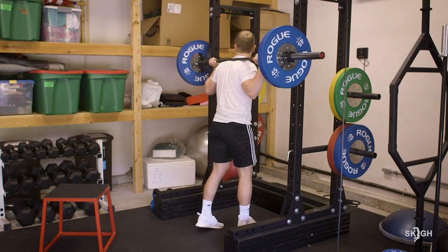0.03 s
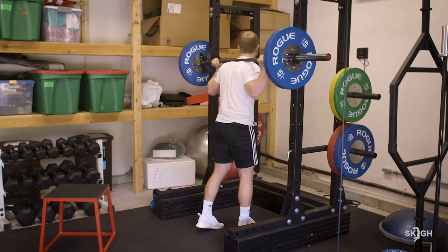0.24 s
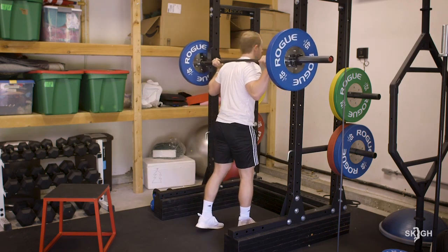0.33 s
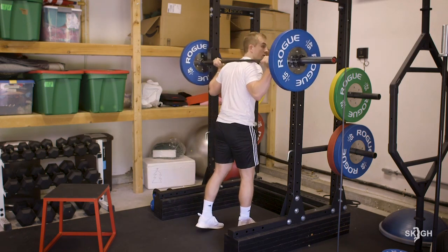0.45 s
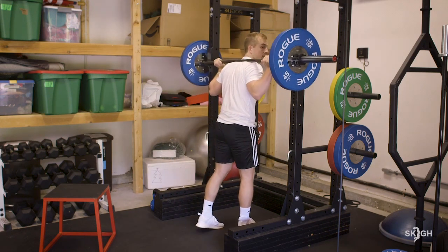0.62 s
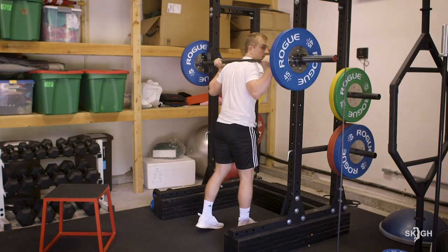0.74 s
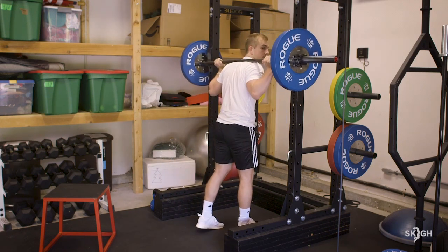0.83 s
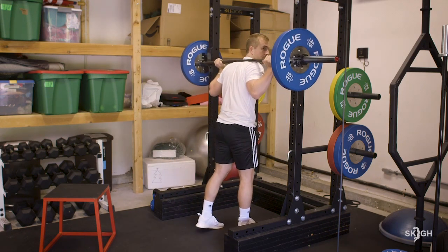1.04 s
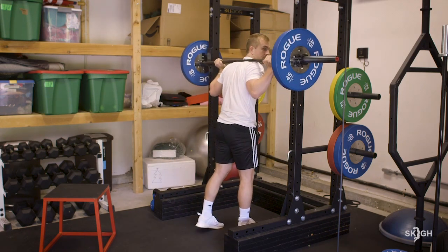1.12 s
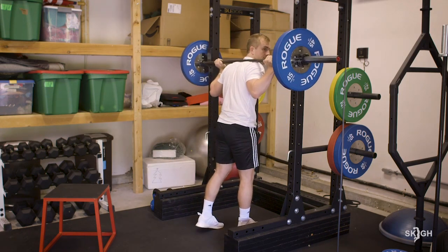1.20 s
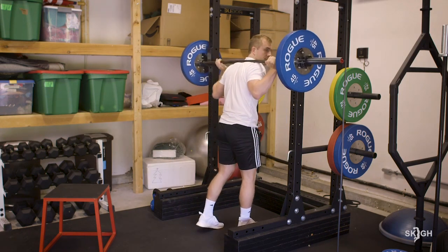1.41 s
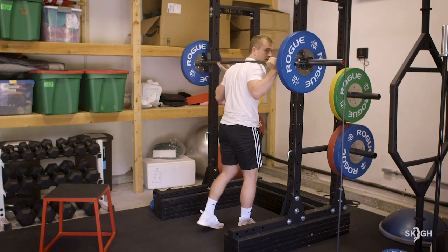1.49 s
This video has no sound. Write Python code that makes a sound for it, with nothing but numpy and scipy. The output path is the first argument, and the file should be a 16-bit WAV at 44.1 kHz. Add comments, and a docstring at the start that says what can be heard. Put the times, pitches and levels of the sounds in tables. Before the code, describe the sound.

A loaded barbell is racked on steel hooks in a small gym. Faint hum and thin hiss lie alone until 0.2 s, when a low thud and quick metal knocks begin. Clatter grows, sleeves clink near 0.5 s, and the hardest bright clang lands at 0.67 s. More knocks follow at 0.75-0.87 s and 1.1-1.3 s, ringing away briefly; a light tick and soft rustle come at 1.43 s.

```python
"""Over a faint low hum and thin hiss, a loaded barbell bumps the uprights of a steel squat rack.
Each knock is a bright noise snap, a dense clang of fading noise and the damped notes of rack and bar.
Thuds of low noise and frame notes carry the weight to the floor; loose sleeves clink as short rings.
The bar rattles along and drops into the hooks, one side after the other, with a faint late room tail.
A small room blurs the ringing into fading noise; last come a light tick and a soft noise rustle."""
import sys
import numpy as np
from scipy.fft import rfft, irfft, next_fast_len
from scipy.io import wavfile

SR = 44100
rng = np.random.default_rng(int(sys.argv[2]) if len(sys.argv) > 2 else 0)


def output_pcm(signal):
    """Save a mono or channel-first signal as 16-bit PCM at the path in sys.argv[1].

    Samples are clipped to [-1, 1] before scaling.
    """
    pcm = np.clip(np.atleast_2d(signal).T, -1, 1) * 32767
    wavfile.write(sys.argv[1], SR, np.round(pcm).astype(np.int16))


N = 68355  # length [samples]


def amp(db):
    """Turn decibels into an amplitude gain."""
    return 10 ** (np.asarray(db) / 20)


def along(points, hz):
    """Read (frequency [Hz], value) points on a log frequency axis."""
    point_hz, values = np.transpose(points)
    return np.interp(np.log(hz + 1), np.log(point_hz + 1), values)


def noise(colour, shade_db=lambda hz: 0):
    """Random-phase noise in a given colour, levelled to rms 1 and only then shaded by frequency."""
    hz = np.fft.rfftfreq(next_fast_len(N + 8192), 1 / SR)
    random_phase = np.exp(2j * np.pi * rng.random(len(hz)))
    spectrum = random_phase * amp(along(colour, hz))
    shaded = irfft(spectrum * amp(shade_db(hz)))[:N]
    return shaded / np.std(irfft(spectrum))


def fade(x, t60s):
    """Split x into overlapping bands that each die exponentially at their own speed."""
    size, t = next_fast_len(N + 8192), np.arange(N) / SR
    hz, spectrum = np.fft.rfftfreq(size, 1 / SR), rfft(x, size)
    centres, lives = np.transpose(t60s)
    out = np.zeros(N)
    for share, life in zip(np.eye(len(lives)), lives):
        # The crossfading bands add up to the whole of x.
        band = irfft(spectrum * along(np.c_[centres, share], hz), size)[:N]
        out += band * amp(-60 * t / life)
    return out


def ring(modes, scatter_db=1.5):
    """Damped sine modes, each struck a little differently by every blow and wavering as it dies."""
    detune = 0.00211  # relative spread: each note is randomly detuned a little at every blow
    waver_db, waver_rate = 1.5, 21.2  # wavering in the room: depth [dB], changes a second
    t = np.arange(N) / SR
    knots = np.arange(0, N / SR + .1, 1 / waver_rate)
    out = np.zeros(N)
    for hz, db, t60 in modes:
        strike_db = db + scatter_db * rng.normal()
        waver = waver_db * np.interp(t, knots, rng.standard_normal(len(knots)))
        level_db = strike_db + waver - 60 * t / t60
        note_hz = hz * (1 + detune * rng.normal())
        # The square root of two gives a steady sine rms 1.
        out += np.sqrt(2) * amp(level_db) * np.sin(2 * np.pi * (note_hz * t + rng.random()))
    return out


def place(x, start, db, rise):
    """Start x at a time [s] and level [dB], swelling in with an exponential time constant [s]."""
    t = np.arange(N) / SR
    swell = 1 - np.exp(-t / max(rise, 1 / SR))
    return amp(db) * np.pad(x * swell, (round(start * SR), 0))[:N]


def background():
    """Low room hum and a thin band of hiss, both steady coloured noise."""
    # spectrum of the room hum: (frequency [Hz], relative level [dB])
    hum_colour = [(12, -20.5), (25, -0.5), (45, -8.5), (65, -11.5), (95, -9), (140, -21.5), (195, -17.5),
                  (250, -28.5), (650, -28), (3800, -47), (7000, -43), (9100, -56), (16000, -83)]
    # spectrum of the hiss: (frequency [Hz], relative level [dB])
    hiss_colour = [(3000, -5.5), (5500, -9.5), (6500, 1.5), (7700, -2), (8200, 11.5), (8750, 3),
                   (9100, -4.5), (16000, -11)]
    hum_level_db, hiss_level_db = -62.5, -69.5
    return amp(hum_level_db) * noise(hum_colour) + amp(hiss_level_db) * noise(hiss_colour)


def chatter():
    """Fast, uneven gain that settles as the steel stops skidding and chattering after a blow."""
    depth_db, rate, life = 1, 350, 0.056  # depth [dB], changes a second, time constant [s]
    t = np.arange(N) / SR
    knots = rng.standard_normal(N // 8)
    jitter = np.interp(t * rate, np.arange(len(knots)), knots)
    return amp(depth_db * np.exp(-t / life) * jitter)


def knocks(bass_hz=850, treble_hz=3300):
    """Steel on steel: a bright snap, then a dense clang with the clear notes of uprights and bar."""
    # blows of bar against rack: (time [s], level [dB], bass [dB], treble [dB], rise [s],
    # near upright [dB], far upright [dB], bar ring [dB], snap [dB])
    blows = [(0.196, -45.5, 8, -1, 0.0067, 1.5, -10, -6, -12), (.221, -36, 8, 7, 0.01, 0, -4, -14, -12),
             (.232, -32.5, -1, 7.5, 0.0089, -1, -16, -18, -3.5),
             (.298, -39.5, 7.5, 1, 0.0093, -4, 6.5, -4, -8), (.323, -30.5, -4, 4, 0.0025, 2, -6, 1, -32),
             (.331, -25, 0, 3.5, 0.0015, -5, -7.5, -1.5, -30),
             (.437, -24.5, -3.5, -1.5, 0.0064, -2, 0.5, -2.5, -6.5),
             (.527, -34.5, 10, -1, 0.0022, -3, -5, 4, -8), (.668, -17, -4, 1.5, 0.0029, -1.5, -22, -2, -16),
             (.749, -26.5, 0.5, 1, 0.0013, -5, -0.5, 1, -25),
             (.763, -24, -18, -10, 0.0023, -4.5, -18, -11, -5),
             (.870, -25, -0.5, -6, 0.0027, -8.5, -0.5, -7.5, -35),
             (1.091, -42.5, 11.5, -3, 0.0023, -3, -1.5, 2, -19),
             (1.219, -26.5, -3, -6.5, .001, -6, 3.5, 0, -12.5),
             (1.28, -38.5, -7, -28, 0.00091, -32, 6.5, 5, -23)]
    # notes of the near upright: (frequency [Hz], level [dB], t60 [s])
    near_modes = [(378, -12, .7), (436, -17, .5), (560, -13, .35), (678, -14, .5), (1055, -15, .6),
                  (1360, -11, .4), (1658, -12, .7), (1875, -14, .4), (1916, -15, .5), (2110, -16, .7),
                  (2230, -16, .5), (2272, -16, .6), (2589, -16, .5)]
    # notes of the far upright: (frequency [Hz], level [dB], t60 [s])
    far_modes = [(366, -12, .4), (797, -16, .5), (818, -14, .45), (1122, -16, .5), (1173, -12, .5),
                 (1248, -15, .5), (1395, -13, .35), (1467, -12, .35), (1663, -13, .4), (1728, -11, .3),
                 (2288, -19, .5), (2692, -19, .3), (2815, -17, .45), (2951, -15, .5), (5200, -25, .25),
                 (6000, -23, .15)]
    # notes of the bar: (frequency [Hz], level [dB], t60 [s])
    bar_modes = [(1335, -18, 1.2), (1342, -19, 1.1), (1524, -20, 1.8), (1529, -23, 1.3)]
    # dense rack resonances blurred by the room: (frequency [Hz], relative level [dB])
    rack_colour = [(100, -16), (260, -10), (350, 2.5), (470, -3), (600, 1), (800, 1), (950, -3),
                   (1150, 1.5), (1400, 2.5), (1800, 2), (2500, -1), (3400, 0), (4300, -10), (5200, -15.5),
                   (6500, -19.5), (8000, -30.5), (11000, -42), (16000, -55)]
    # decay of those resonances: (frequency [Hz], t60 [s])
    rack_t60 = [(200, 0.92), (700, 0.7), (1500, 0.49), (3000, 0.49), (6000, 0.29), (14000, 0.69)]
    # spectrum of the bright first contact: (frequency [Hz], relative level [dB])
    snap_colour = [(1000, -25), (3500, 11), (6200, -3.5), (7500, -8), (10000, -18.5), (13500, -26),
                   (16000, -34)]
    snap_life, snap_rise = 0.014, 0.00091  # time constants [s]
    out, t = np.zeros(N), np.arange(N) / SR
    for start, db, bass_db, treble_db, rise, near_db, far_db, bar_db, snap_db in blows:
        def shade_db(hz):
            """Smooth bass and treble shelves set the tone of this blow."""
            bass = bass_db / (1 + (hz / bass_hz) ** 4)
            treble = treble_db * (1 - 1 / (1 + (hz / treble_hz) ** 4))
            return bass + treble

        clang = fade(noise(rack_colour, shade_db), rack_t60) * chatter()
        parts = ((near_modes, near_db), (far_modes, far_db), (bar_modes, bar_db))
        notes = ring([(hz, mode_db + part_db + shade_db(hz), t60)
                      for modes, part_db in parts
                      for hz, mode_db, t60 in modes])
        snap = noise(snap_colour) * chatter() * np.exp(-t / snap_life)
        out += place(clang + notes, start, db, rise)
        out += place(snap, start, db + snap_db, snap_rise)
    return out


def thuds():
    """The load shakes frame and floor; the first thud starts with one deep, damped sine push."""
    # weight through the frame: (time [s], level [dB], rise [s], frame hum [dB])
    jolts = [(.197, -35, 0.0027, -32), (.32, -34.5, 0.015, -9), (0.442, -46, 0.0097, 5),
             (.527, -38.5, 0.005, 6), (0.668, -34, 0.0014, 1), (0.756, -38, 0.0037, 7),
             (.872, -42.5, 0.0049, 9), (1.0, -40, 0.0049, 3), (1.11, -44.5, 0.005, 9.5),
             (1.426, -66, .004, -8)]
    # notes of the frame: (frequency [Hz], level [dB], t60 [s])
    frame_modes = [(353, -4.5, 0.18), (380.1, -6, 0.32), (401, -16, .3)]
    # spectrum of the thud in frame and floor: (frequency [Hz], relative level [dB])
    thud_colour = [(15, -15), (30, 5), (45, -1), (75, -3.5), (120, -6.5), (200, -11.5), (280, -20),
                   (800, -32), (3000, -90)]
    # decay of the thud: (frequency [Hz], t60 [s])
    thud_t60 = [(30, 0.55), (100, 0.96), (300, 0.92)]
    push_hz, push_life = 60, .015  # frequency [Hz], time constant [s]
    t = np.arange(N) / SR
    push = -np.sin(2 * np.pi * push_hz * t) * np.exp(-t / push_life)
    out = place(push, jolts[0][0], db=-20, rise=0.0098)
    for start, db, rise, hum_db in jolts:
        body = fade(noise(thud_colour), thud_t60)
        frame_hum = amp(hum_db) * ring(frame_modes)
        out += place(body + frame_hum, start, db, rise)
    return out


def clink(body, modes, ring_db):
    """A short, bright ring of solid steel, strongest in its first, direct milliseconds."""
    # decay of the blurred clink: (frequency [Hz], t60 [s])
    clink_t60 = [(3000, 0.34), (7000, 0.4), (14000, 0.4)]
    direct_db, direct_life = 7.5, 0.0063  # extra direct part [dB], time constant [s]
    t = np.arange(N) / SR
    ringing = fade(body, clink_t60) + amp(ring_db) * ring(modes)
    return ringing * (1 + amp(direct_db) * np.exp(-t / direct_life))


def clinks(top_hz=6000):
    """The loose sleeves snap against their play and ring as blurred noise and clear notes."""
    # sleeve hits: (time [s], level [dB], top end [dB], rise [s], ring [dB])
    sleeve_hits = [(0.199, -53.5, -11, 0.0024, -16), (.523, -29, -1.5, 0.0041, -7.5),
                   (1.09, -44, -5.5, .003, -9.5)]
    # notes of the sleeves: (frequency [Hz], level [dB], t60 [s])
    sleeve_modes = [(3890, -12, 0.27), (3710, 2, 0.17), (4320, 0, 0.17), (4470, -20, 0.35),
                    (4900, -7, 0.16), (6630, -16, .3), (7090, -26, 0.12)]
    # dense sleeve resonances blurred by the room: (frequency [Hz], relative level [dB])
    sleeve_colour = [(1000, -4), (3000, -14), (3650, 3.5), (4150, -2.5), (4500, 3.5), (5300, -16),
                     (6400, -18), (7000, -5), (7700, -25.5), (9500, -27), (11000, -27.5), (12500, -39),
                     (16000, -46)]
    out = np.zeros(N)
    for start, db, top_db, rise, ring_db in sleeve_hits:
        body = noise(sleeve_colour, lambda hz: top_db * (hz > top_hz))
        out += place(clink(body, sleeve_modes, ring_db), start, db, rise)
    return out


def drop():
    """The bar lands hard in the first hook; a faint late room tail of slowly fading noise follows."""
    # notes of the hook: (frequency [Hz], level [dB], t60 [s])
    hook_modes = [(560, -6, .2), (600, -10, .18), (1100, -8, .2), (3391, -4, .32), (3421, -8, .3),
                  (3493, -8, .3), (3545, -2, .32), (3940, -8, .42), (4235, -8, .22), (4727, -24, .7),
                  (5130, -19, .3), (5798, -25, .6), (6605, -16, .27), (6950, -17, .52), (9750, -22, .25)]
    # dense hook resonances: (frequency [Hz], relative level [dB])
    hook_colour = [(1000, -33), (2900, -33), (3450, 7), (4100, 1.5), (4600, -6), (6100, -10), (6850, -1.5),
                   (7900, -18), (9300, -22.5), (9800, -17), (12000, -29.5), (16000, -40)]
    # faint late room tail: (frequency [Hz], relative level [dB])
    tail_colour = [(300, 0), (1500, -2), (4000, 7), (5500, -3), (7200, -1), (9000, -19), (16000, -30)]
    tail_db, tail_t60 = -24.5, 1  # level relative to the landing [dB], decay by 60 dB [s]
    t = np.arange(N) / SR
    landing = clink(noise(hook_colour), hook_modes, ring_db=-3)
    tail = amp(tail_db - 60 * t / tail_t60) * noise(tail_colour)
    return place(landing + tail, start=.668, db=-18, rise=.008)


def rustle():
    """A light tick and a soft noise rustle as the lifter eases off the bar."""
    # spectrum of tick and rustle: (frequency [Hz], relative level [dB])
    rustle_colour = [(40, -1), (100, 25), (200, 5), (600, 10.5), (2000, 6), (6000, -4.5), (10000, -9),
                     (16000, -13)]
    tick_db, tick_life = 12, .009  # extra gain of the tick [dB], time constant [s]
    t = np.arange(N) / SR
    tick_gain = 1 + amp(tick_db) * np.exp(-t / tick_life)
    return place(noise(rustle_colour) * tick_gain, start=1.428, db=-54.5, rise=0.00067)


def scene():
    """Everything summed at one microphone."""
    return (background() + knocks() + thuds() + clinks() + drop() + rustle())[None]


def record(dry):
    """The recorder keeps nothing above its band limit."""
    top_hz = 15850
    size = next_fast_len(N + 8192)
    passband = np.fft.rfftfreq(size, 1 / SR) < top_hz
    return irfft(rfft(dry, size) * passband, size)[:, :N]


dry = scene()
out = record(dry)
output_pcm(out)
```